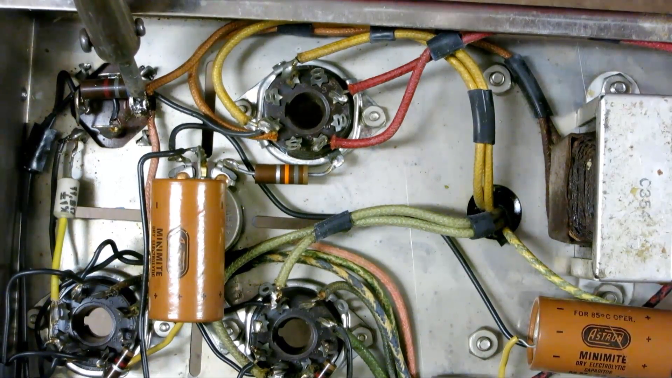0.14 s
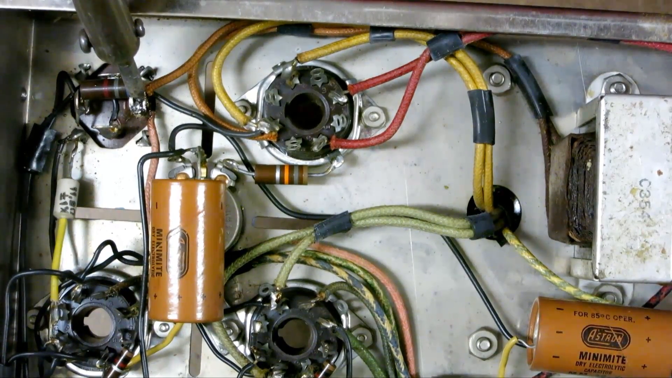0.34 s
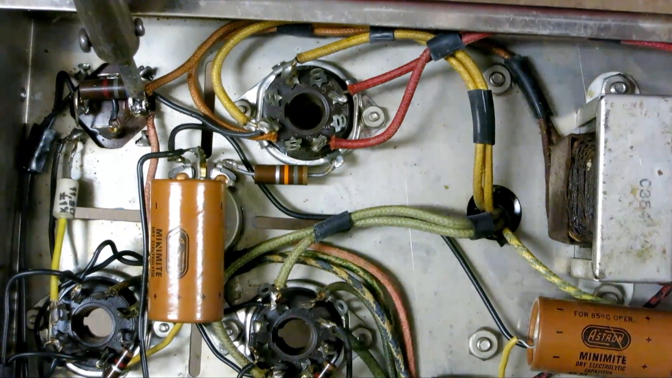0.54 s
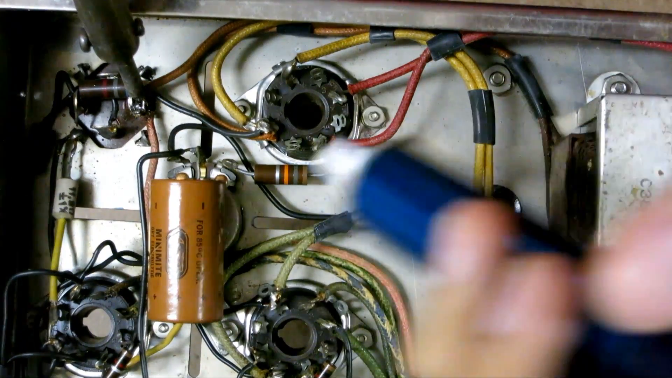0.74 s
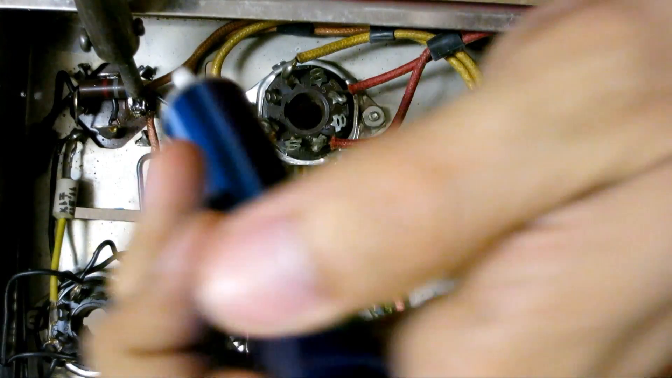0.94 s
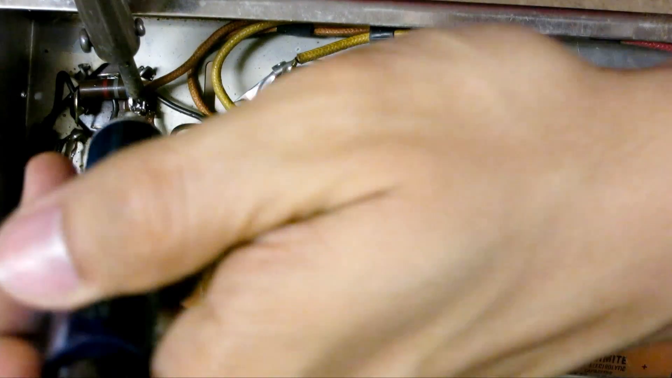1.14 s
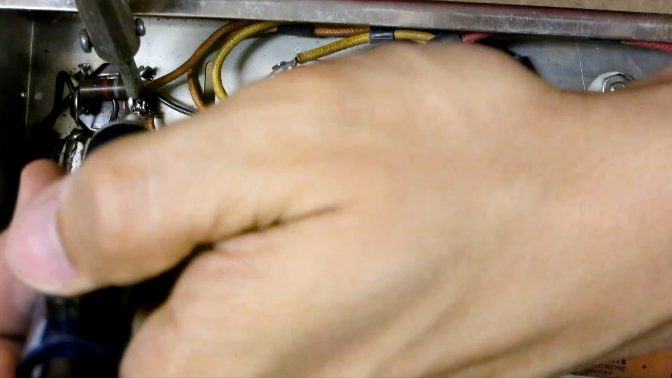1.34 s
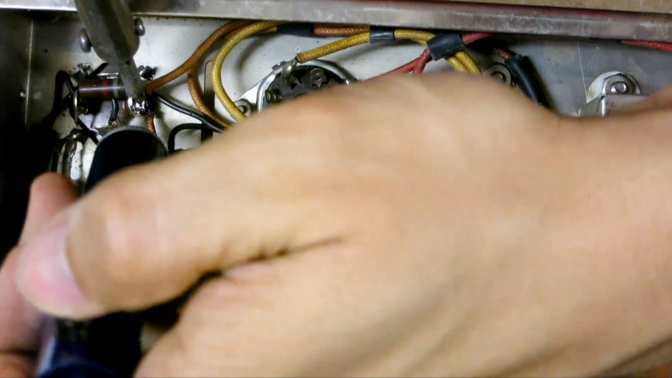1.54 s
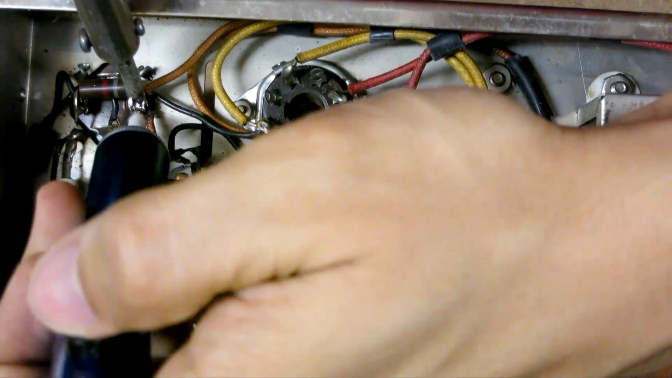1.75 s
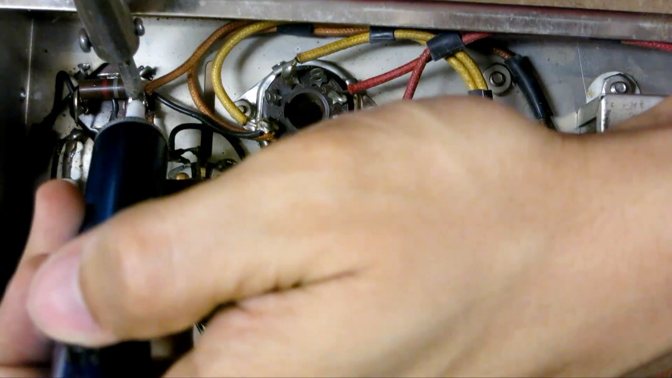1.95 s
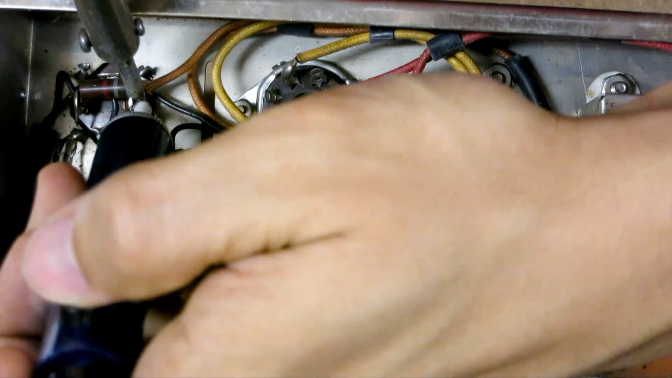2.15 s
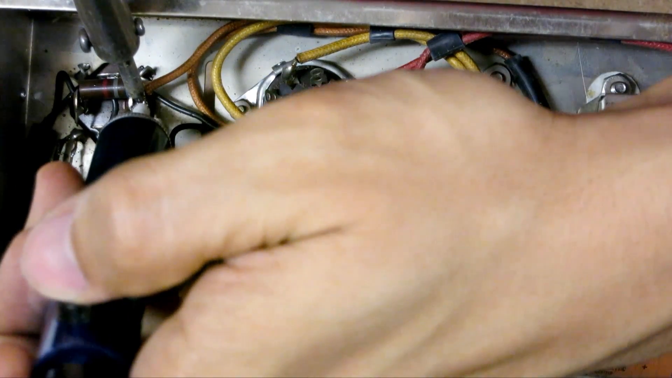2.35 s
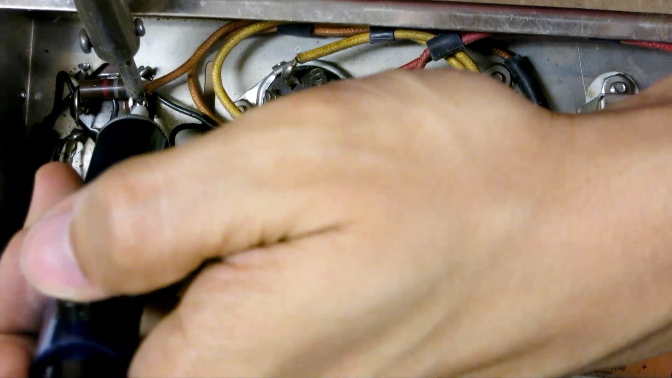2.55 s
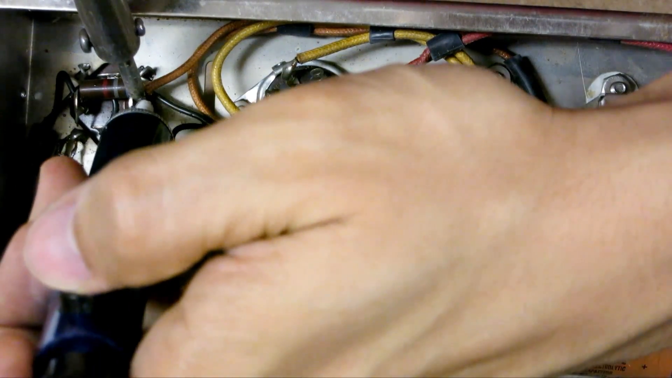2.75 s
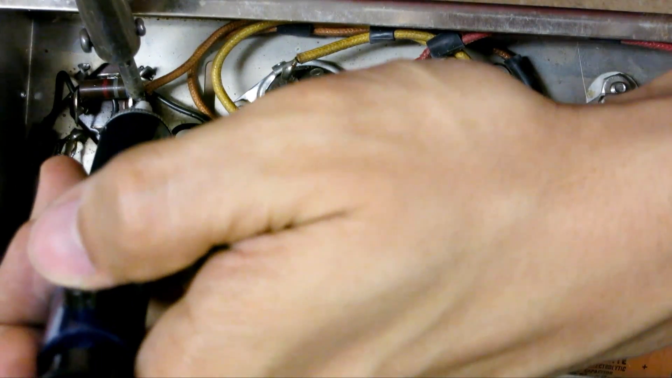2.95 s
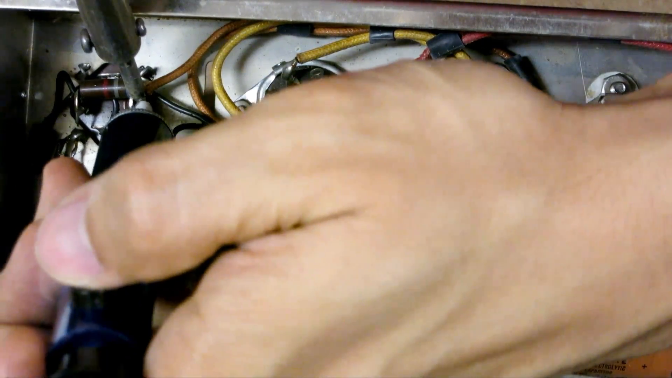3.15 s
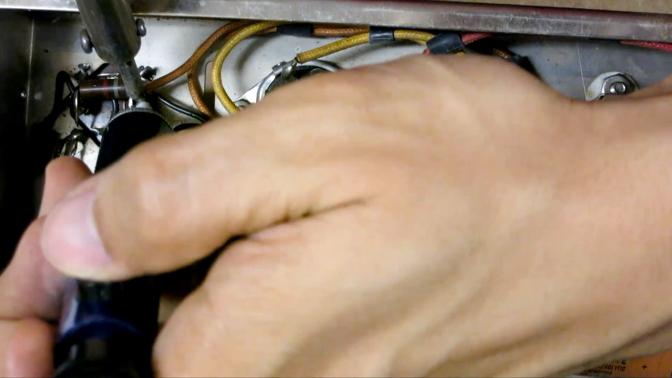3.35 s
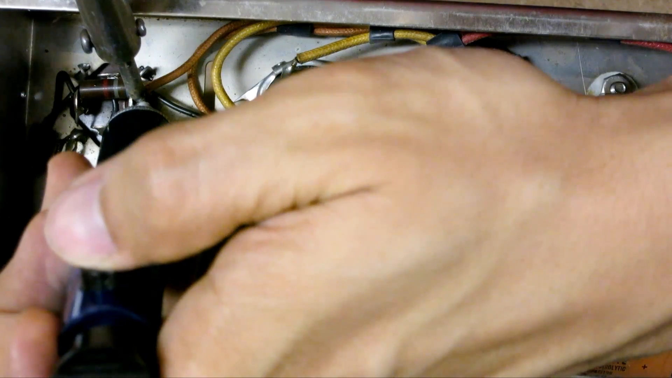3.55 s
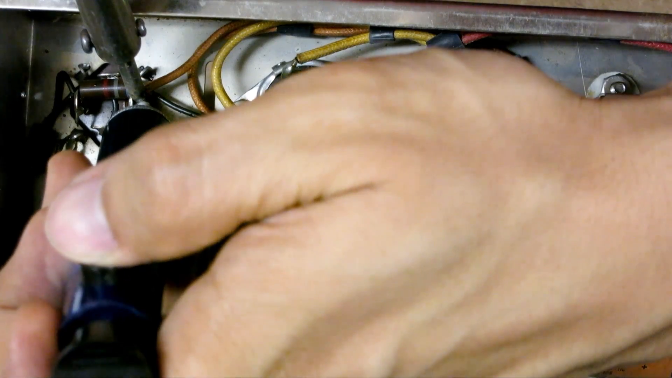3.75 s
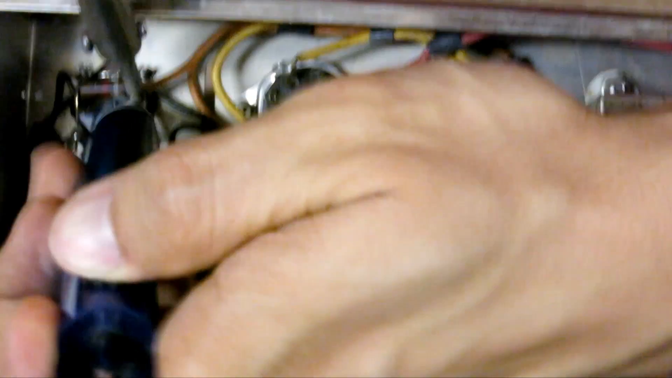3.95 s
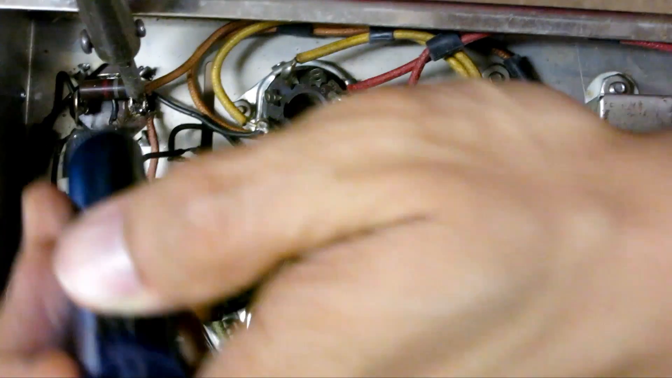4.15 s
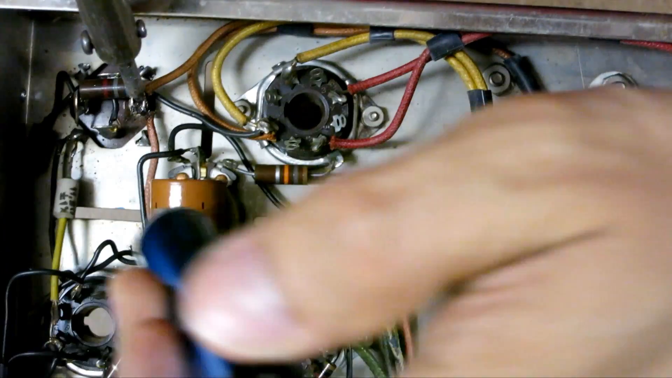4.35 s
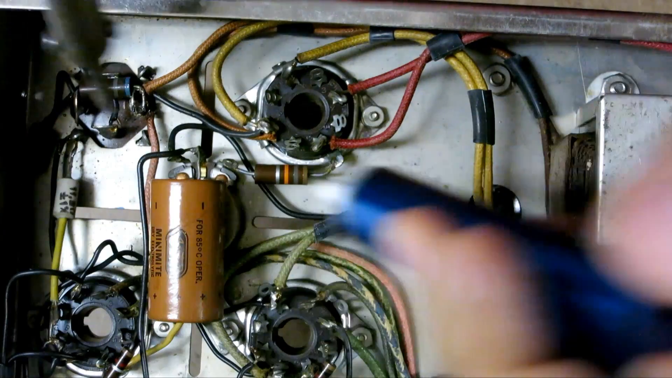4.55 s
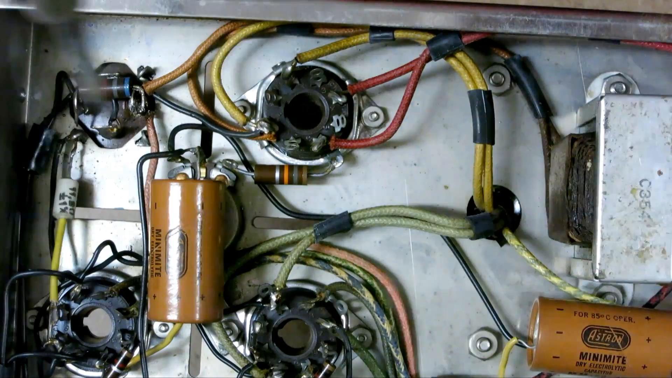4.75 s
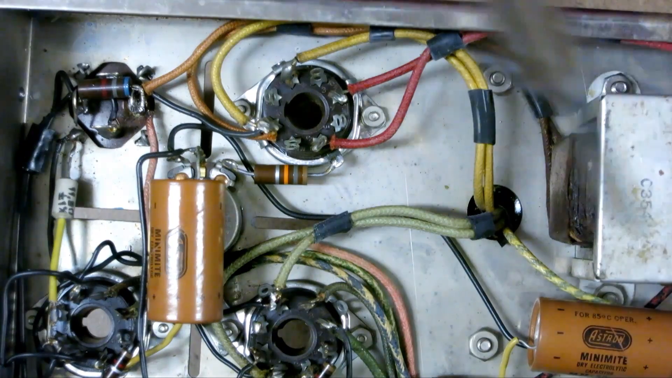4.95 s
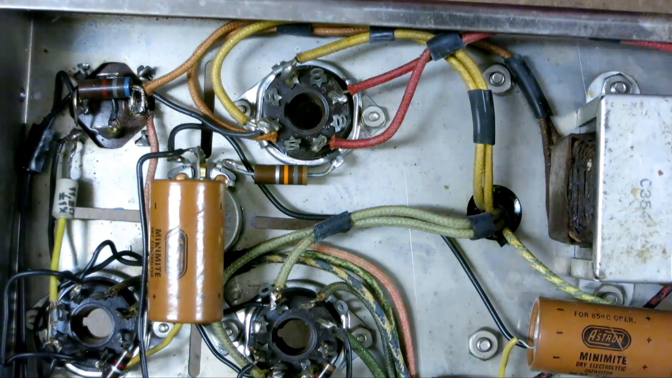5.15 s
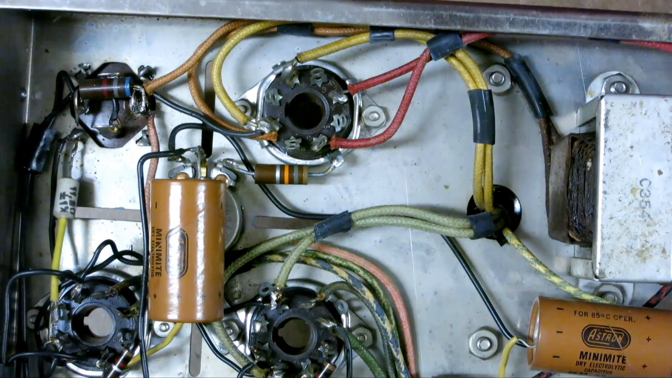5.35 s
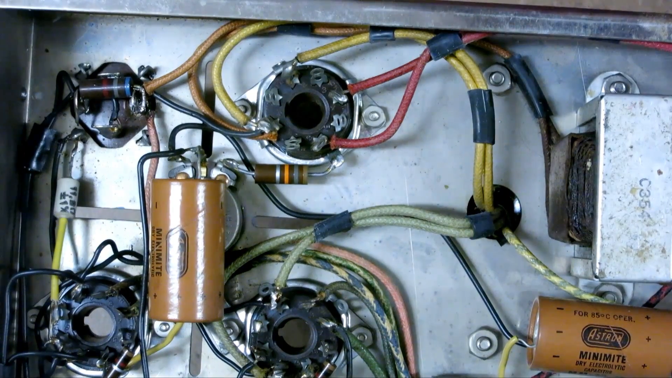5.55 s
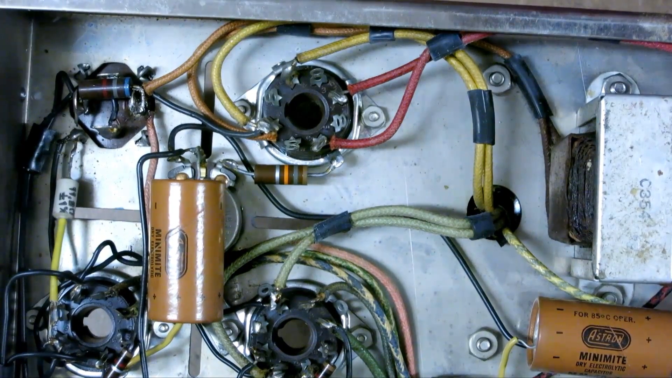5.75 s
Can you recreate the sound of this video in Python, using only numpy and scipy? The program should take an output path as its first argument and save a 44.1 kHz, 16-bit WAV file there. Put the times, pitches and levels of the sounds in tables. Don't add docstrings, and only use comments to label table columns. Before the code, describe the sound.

Quiet workbench with soft hum and irregular camera focus ticks; a desoldering pump fires once with a hard metallic snap, then small clicks and rustles.

```python
import sys
import numpy as np
from scipy import signal
from scipy.fft import rfft, irfft
from scipy.io import wavfile
from scipy.ndimage import uniform_filter1d

SR = 44100
rng = np.random.default_rng(int(sys.argv[2]) if len(sys.argv) > 2 else 0)


def natural_amplitude(level_db):
    exponent = np.asarray(level_db, float) / 20
    return 10 ** exponent


def materialize(psi):
    bounded = np.clip(np.atleast_2d(psi).T, -1, 1)
    quanta = np.round(bounded * 32767).astype(np.int16)
    wavfile.write(sys.argv[1], SR, quanta)


N = 255603

# t/s, level/dB
GAIN = [(0.0, -8.5), (.35, -7.5), (.62, -4.5), (1.22, -4.5), (1.6, -1), (3.9, 0), (4.25, -13), (4.4, -14),
        (4.68, -13), (5.0, -5.5), (5.4, -6.5)]
# hold t/s, snap t/s, later value read at t/s
GAIN_DROP = (3.9, 3.99, 4.25)
# t/s, reduction/dB
GATE = [(3.99, 0), (4.25, 4.5), (4.5, 2.5), (4.7, 0)]
# f/Hz, density/dB
HUM_SPECTRUM = [(15, -39), (25, -9), (87, 0), (657, -8), (728, -7), (875, -9), (969, -8), (1210, -7),
                (1520, -16), (1900, -13), (2330, -21), (2980, -20), (3300, -27), (4290, -57), (7260, -120)]
# f/Hz, width/Hz, level/dB
ROOM_MODES = [
    (81, 16, -10),
    (420, 200, -14),
    (1210, 120, -15),
    (1900, 200, -22),
    (2600, 500, -25),
    (3000, 90, -20),
]
# f/Hz, density/dB
HISS_SPECTRUM = [(1500, -20), (3000, -7), (3500, -6.5), (4500, -2), (12700, -4.5), (15500, -8)]
# t/s, rise/dB, half length/s
TRAFFIC_SWELLS = [(.1, 8, .04), (.45, 11, .08), (.8, 7, .14), (1.62, 9, .2), (2.1, 3, .2), (3.3, 3, .15),
                  (3.55, 9, .04), (4.95, 8, .15), (5.42, 10, .05), (5.8, 6, .15)]
# t/s, peak/dB, f/Hz, width/Hz, t60/s
TOOL_TAPS = [(.419, -46, 1150, 500, .03), (.430, -49, 600, 900, .1), (.431, -56, 5700, 900, .02),
             (.731, -47, 8300, 1500, .06), (.731, -50, 5500, 3500, .08), (3.274, -52, 1500, 2000, .04),
             (3.914, -46, 2500, 3000, .04), (3.965, -56, 1500, 3000, .02), (4.205, -43, 5300, 500, .018),
             (4.206, -43, 2650, 500, .02), (4.408, -62, 11000, 8000, .07), (4.415, -63, 7400, 600, .03),
             (4.415, -60, 900, 900, .06), (4.418, -61, 2050, 250, .04), (4.735, -72, 8000, 1500, .15),
             (4.86, -64, 9000, 700, .12), (5.417, -42, 1100, 1500, .025), (5.417, -50, 350, 300, .06),
             (5.417, -54, 9000, 9000, .03), (5.455, -56, 2500, 2500, .02), (5.562, -54, 2400, 700, .025),
             (5.620, -56, 6000, 2000, .03), (5.748, -52, 1500, 2500, .04), (5.759, -48, 11500, 3000, .05)]
# (f/Hz, level/dB, t60/s)
CHASSIS_KNOCK = (.430, -38, [(393, -10, 0.24), (754, -6, 0.07), (1017, -5, 0.18), (1600, 0, 0.05),
                 (1740, 4, 0.028), (2430, 0, 0.04), (3165, -14, 0.035), (3698, -31, 0.16),
                 (4080, -13, 0.035), (4371, -27, 0.062)])
# t/s, peak/dB, f/Hz
BEAD_TICKS = [(.431, -56, 10000), (.588, -62, 4000), (2.297, -58, 6000), (2.879, -58, 5000),
              (3.351, -56, 5000), (3.913, -33, 6000), (3.913, -35, 12000), (4.040, -44, 7000),
              (4.059, -44, 8500), (4.123, -48, 8500), (4.189, -58, 6000), (4.194, -45, 5000),
              (4.206, -52, 11000), (4.284, -43, 5500), (4.307, -60, 4000), (4.332, -68, 10000),
              (4.366, -55, 11000), (4.388, -57, 9000), (4.428, -62, 11000), (4.447, -62, 11000),
              (4.54, -64, 9000), (4.592, -58, 5600), (4.718, -65, 3900), (4.822, -53, 7000),
              (4.873, -62, 4000), (5.663, -48, 8000), (5.682, -54, 13000), (5.699, -42, 6500),
              (5.729, -46, 6000), (5.746, -41, 7500)]
# t/s, hold/s, level/dB, centre f/Hz
RUBS = [(.52, .05, -72, 11000), (.80, .05, -70, 11500), (1.26, .005, -77, 10000), (1.345, .025, -72, 11000),
        (4.58, .25, -82, 11000), (5.02, .07, -77, 12000), (5.43, .03, -69, 11000), (5.47, .09, -70, 8000),
        (5.568, .006, -58, 7000), (5.59, .2, -66.5, 8000), (5.748, .026, -58, 10500),
        (5.62, .02, -66, 6000), (5.56, .07, -74, 2600)]
# t/s, peak/dB, depth/dB
FIRM_STEPS = [(1.254, -45, -6), (1.42, -45, -3), (1.546, -38, 3), (1.671, -42, -2), (1.921, -38, 1),
              (2.046, -35, 4), (2.212, -34, 3), (2.379, -35, 3), (2.505, -37, -1), (2.671, -40, -6),
              (2.838, -41, -4), (3.006, -39, 3), (3.172, -39, 1), (3.298, -46, 1), (3.422, -42, 1),
              (3.839, -44, -2), (4.924, -44, 4), (5.425, -41, 4), (5.507, -47, 2), (5.591, -42, 4)]
# t/s, peak/dB
LIGHT_STEPS = [(1.341, -55), (1.472, -52), (1.638, -51), (1.755, -52), (1.88, -51), (2.146, -51),
               (2.319, -50), (2.464, -48), (2.595, -53), (2.92, -54), (3.226, -53), (3.464, -52),
               (3.543, -51)]
# f/Hz, level/dB, t60/s
HOUSING_MODES = [(560, -4, .05), (690, 5, .035), (790, 9, .04), (964, 11.5, .05), (1210, .7, .024),
                 (1400, -7, .02), (1900, 7, .025), (2000, 6, .025), (2900, -3, .012), (3400, -1, .015),
                 (3950, 0, .015), (4300, 9, .018)]
# t/s, peak/dB, f/Hz, width/Hz, t60/s
PLUNGER_KNOCKS = [(3.9842, -11, 9000, 5000, .005), (3.9843, -17, 14500, 2500, .005),
                  (3.9862, -17, 11000, 2500, .005), (3.9876, -7, 9400, 1300, .007),
                  (3.9875, -13, 4350, 1000, .007), (3.9850, -30, 480, 600, .05),
                  (3.9860, -22, 2900, 1200, .03), (3.9933, -19, 2000, 1500, .005),
                  (3.9984, -17, 3300, 2000, .004), (3.9986, -11, 12300, 3000, .005),
                  (3.9989, -12, 9000, 3000, .006), (3.9990, -17, 14700, 900, .035),
                  (4.0012, -15, 10800, 2500, .008), (4.0041, -11, 10300, 2500, .008),
                  (4.0038, -20, 5900, 1500, .014), (4.0145, -27, 1600, 2200, .035),
                  (4.0152, -21, 9200, 1800, .014), (4.0157, -23, 5950, 600, .014),
                  (4.0170, -30, 14600, 1200, .02)]
# start t/s, end t/s, level/dB
PISTON_SLIDE = (3.9842, 4.0056, -25)
# f/Hz, density/dB
SLIDE_SPECTRUM = [(200, -22), (500, -10), (1200, -9), (2000, -6), (3400, -9), (4400, -5), (6000, -4),
                  (6700, -13), (7800, -3), (9800, -1), (11500, -6), (14600, -4), (16000, -10)]
# t/s, peak/dB, f/Hz, half length/s
END_STOP = (3.9985, -6, 1780, .00026)
# f/Hz, width/Hz, level/dB, t60/s
BARREL_MODES = [
    (78, 40, -55.5, .6),
    (330, 250, -57, .6),
    (600, 600, -56, .35),
    (2300, 1600, -49, .42),
    (5950, 900, -58, .4),
    (7790, 500, -57, .45),
    (10200, 700, -56, .3),
    (12450, 400, -60, .3),
    (14650, 900, -52, .32),
]
# t/s, f/Hz, level/dB
SQUEAK_GLIDE = [
    (4.98, 600.0, -82),
    (4.99, 600.2, -89),
    (5.01, 594.6, -67),
    (5.058, 571.0, -65),
    (5.156, 564.6, -74),
    (5.19, 541.0, -79),
]
# f/Hz, level/dB
MIC_RESPONSE = [(10, -30), (40, -4), (60, 0), (15000, 0), (15700, -6), (16200, -20), (16800, -42),
                (17200, -80), (18000, -100)]


def evened(x):
    return x / np.sqrt(np.mean(x ** 2) + 1e-20)


def read(points, hz):
    f, value = np.transpose(points)
    return np.interp(np.log(hz + 1), np.log(f + 1), value)


def add(mix, s, sound):
    part = mix[round(s * SR):][:len(sound)]
    part += sound[:len(part)]


def resonate(x, hz, width):
    turn = np.exp(2j * np.pi * np.cumsum(hz * np.ones(len(x))) / SR)
    r = np.exp(-np.pi * width / SR)
    smooth = signal.lfilter([1 - r], [1, -r], x / turn + 1e-18)
    return 2 * (turn * smooth).real


def coloured(spectrum, count, patchy_db):
    frames, hz = count // 256 + 5, np.fft.rfftfreq(1024, 1 / SR)
    a, b, patches = rng.standard_normal((frames, 513, 3)).T
    patches = uniform_filter1d(patches, size=8, axis=0)
    patches = evened(uniform_filter1d(patches, size=12, axis=1))
    z = (a + 1j * b) * natural_amplitude(read(spectrum, hz))[:, None] * natural_amplitude(patchy_db * patches)
    return evened(signal.istft(z, nperseg=1024, noverlap=768)[1][:count])


def contacts(rows):
    out, t = np.zeros(N), np.arange(5000) / SR
    bass_cut = signal.butter(2, 260 / (SR / 2), "high")
    for (s, peak_db, hz, width, t60), noise in zip(rows, rng.standard_normal((len(rows), len(t)))):
        burst = (noise + 3.0 * (t < 1 / SR)) * natural_amplitude(-60 * t / t60)
        burst = resonate(resonate(burst, hz, width), hz, width) + .02 * burst
        burst = signal.lfilter(*bass_cut, burst)
        add(out, s, natural_amplitude(peak_db) * burst / abs(burst).max())
    return out


def room():
    hum_db, hiss_db, drone_db = -58.4, -69.4, -71
    hiss_share = .9
    gate_hum, gate_hiss, gate_drone = .9, .6, 3.5
    held, snap, after = GAIN_DROP
    now = np.arange(N) / SR
    t = np.where((now > held) & (now < after), np.where(now < snap, held, after), now)
    gain_db = np.interp(t, *np.transpose(GAIN))
    gated_db = np.interp(t, *np.transpose(GATE))
    late_db = np.interp(now - .08, *np.transpose(GATE))

    hum = coloured(HUM_SPECTRUM, N, patchy_db=1.5)
    for hz, width, db in ROOM_MODES:
        hum = hum + natural_amplitude(db) * evened(resonate(rng.standard_normal(N), hz, width))
    hiss = coloured(HISS_SPECTRUM, N, patchy_db=.6)
    drone = evened(resonate(resonate(rng.standard_normal(N), 295, 110), 295, 110))
    swell_db = sum(db * np.exp(-((now - s) / half) ** 2) for s, db, half in TRAFFIC_SWELLS)

    out = natural_amplitude(hum_db + gain_db - gate_hum * gated_db) * evened(hum)
    out += natural_amplitude(hiss_db + hiss_share * gain_db - gate_hiss * gated_db) * hiss
    return out + natural_amplitude(drone_db + gain_db + swell_db - gate_drone * late_db) * drone


def tools():
    return contacts(TOOL_TAPS)


def iron():
    s, peak_db, modes = CHASSIS_KNOCK
    out, t = np.zeros(N), np.arange(8000) / SR
    ring = sum(natural_amplitude(db - 60 * t / min(t60, .12)) * np.sin(2 * np.pi * hz * t) for hz, db, t60 in modes)
    ring = ring * (1 - np.exp(-t / .001))
    add(out, s, natural_amplitude(peak_db) * ring / abs(ring).max())
    return out


def beads():
    return contacts([(s, db, hz, min(1.1 * hz, 6500), .015) for s, db, hz in BEAD_TICKS])


def rustle(start, hold, level_db, centre_hz):
    rise_s, fall_s, range_db = .02, .035, 20
    t = np.arange(-rise_s, hold + fall_s, 1 / SR)
    unevenness = evened(uniform_filter1d(rng.standard_normal(len(t)), size=150))
    grains = rng.standard_normal(len(t)) * natural_amplitude(3.3 * unevenness)
    under = np.maximum(np.maximum(-t / rise_s, (t - hold) / fall_s), 0)
    rub = evened(resonate(grains, centre_hz, 5000))
    return start - rise_s, natural_amplitude(level_db - range_db * under) * rub


def flux():
    t = np.arange(N) / SR
    size = natural_amplitude(3.5 * np.minimum(rng.exponential(1, N), 4)) * (rng.random(N) < 90 / SR)
    pop = rng.standard_normal(200) * natural_amplitude(-60 * t[:200] / .006)
    pops = signal.oaconvolve(size, pop)[:N]
    heating = np.interp(t, [1.0, 1.5, 3.9, 3.98], [0, 1, 1, 0])
    return natural_amplitude(-78) * evened(resonate(pops, 4500, 5000)) * heating


def focus_motor():
    firm_db, light_db = (-14, -15, -21), (-11, -14, -15)
    depth_tilt = (1.2, -.5, -1.2)
    out, t = np.zeros(N), np.arange(4000) / SR
    moves = [(s, db, *np.add(firm_db, np.multiply(depth_tilt, depth))) for s, db, depth in FIRM_STEPS]
    moves += [(s, db, *light_db) for s, db in LIGHT_STEPS]
    detune = rng.uniform(-1, 1, (len(moves), len(HOUSING_MODES)))
    edges = rng.standard_normal((len(moves), len(t)))
    for (s, peak_db, low_db, upper_db, edge_db), row, edge in zip(moves, detune, edges):
        ring = np.zeros(len(t))
        for (hz, db, t60), d in zip(HOUSING_MODES, row):
            if hz > 4100:
                group_db = edge_db
            elif hz > 3100:
                group_db = low_db
            elif hz > 1600:
                group_db = upper_db
            else:
                group_db = low_db * (hz < 1000)
            decay = natural_amplitude(db + group_db + 2.5 * d - 60 * t / t60)
            ring += decay * np.sin(2 * np.pi * hz * (1 + .015 * d) * t)
        ring = ring * (1 - np.exp(-t / .0009))
        ring = ring + natural_amplitude(edge_db + 5.0 - 60 * t / .012) * resonate(edge, 6000, 9000)
        ring = ring / abs(ring).max()
        add(out, s - .0003, natural_amplitude(peak_db - .8) * ring)
        add(out, s + .0045, natural_amplitude(peak_db + low_db + 1.0) * ring)

    frame_s, hold_db = 1 / 23.976, -65
    frames = np.arange(1.2547, 3.86, frame_s)
    size = np.minimum(rng.exponential(1, (len(frames), 2)), 2.5)
    steps = [(s, hold_db + 2.5 * a - 1.5, 3900, 2000, .02) for s, (a, b) in zip(frames, size)]
    steps += [(s, hold_db + 2.5 * b, 7000, 7000, .012) for s, (a, b) in zip(frames, size)]
    return out + contacts(steps)


def pump():
    out = contacts(PLUNGER_KNOCKS)

    start, end, slide_db = PISTON_SLIDE
    t = np.arange(SR // 20) / SR
    rattle = natural_amplitude(2.5 * evened(uniform_filter1d(rng.standard_normal(len(t)), size=30)))
    shape = np.minimum(t / .0004, 1) * natural_amplitude(-60 * np.maximum(t - (end - start), 0) / .014)
    scrape = coloured(SLIDE_SPECTRUM, len(t), patchy_db=1.2)
    add(out, start, natural_amplitude(slide_db) * shape * rattle * scrape)

    s, peak_db, hz, half = END_STOP
    u = np.arange(-200, 400) / SR
    spread = np.where(u < 0, half, 1.7 * half)
    thump = -np.cos(2 * np.pi * hz * u) * np.exp(-(u / spread) ** 2)
    add(out, s - 200 / SR, natural_amplitude(peak_db) * thump)

    t = np.arange(SR) / SR
    for (hz, width, db, t60), noise in zip(BARREL_MODES, rng.standard_normal((len(BARREL_MODES), SR))):
        add(out, s, natural_amplitude(db - 60 * t / t60) * evened(resonate(resonate(noise, hz, width), hz, width)))
    echo_db, echo_t60 = -48, .33
    add(out, s, natural_amplitude(echo_db - 60 * t / echo_t60) * coloured(SLIDE_SPECTRUM, SR, patchy_db=2.5))
    return out


def squeak():
    s, hz, db = np.transpose(SQUEAK_GLIDE)
    t = np.arange(s[0], s[-1], 1 / SR)
    waver = evened(uniform_filter1d(rng.standard_normal(len(t)), size=900))
    pitch = np.interp(t, s, hz) + 8.0 * waver
    tone = np.sqrt(2) * np.sin(2 * np.pi * np.cumsum(pitch) / SR)
    return s[0], natural_amplitude(np.interp(t, s, db) + 2.5 * waver) * tone * signal.windows.tukey(len(t), .2)


def scene():
    mix = room() + tools() + iron() + beads() + flux() + focus_motor() + pump()
    for row in RUBS:
        add(mix, *rustle(*row))
    add(mix, *squeak())
    return mix[None]


def top_cut(x):
    return signal.sosfilt(signal.butter(12, 16950, fs=SR, output="sos"), x)


def record(dry):
    end_s = 5.796
    response = natural_amplitude(read(MIC_RESPONSE, np.fft.rfftfreq(N, 1 / SR)))
    fade = np.clip((end_s - np.arange(N) / SR) / .002, 0, 1)
    heard = irfft(rfft(dry) * response, N) * fade
    return top_cut(heard)


dry = scene()
out = record(dry)
materialize(out)
```